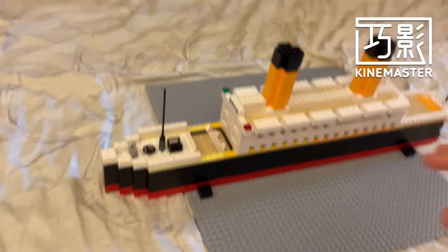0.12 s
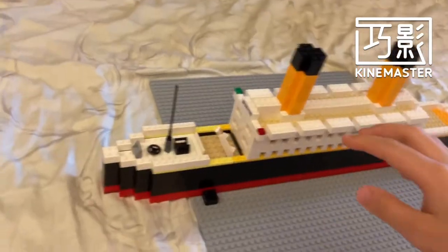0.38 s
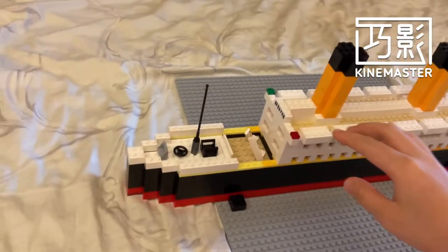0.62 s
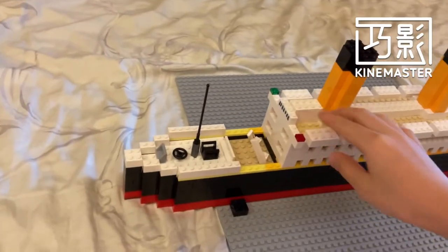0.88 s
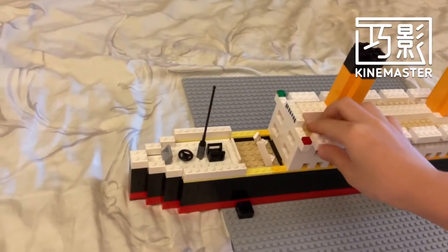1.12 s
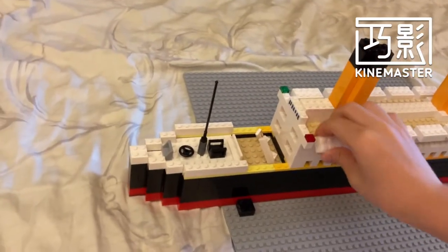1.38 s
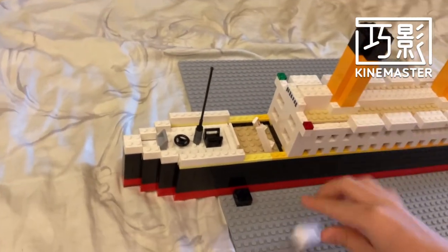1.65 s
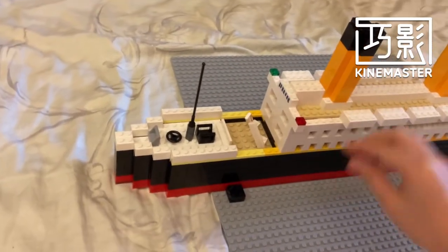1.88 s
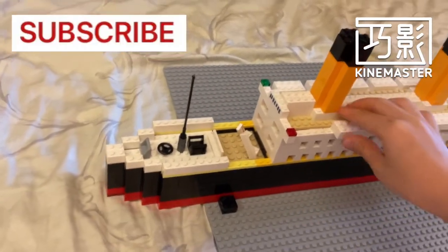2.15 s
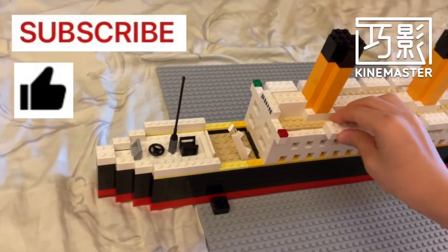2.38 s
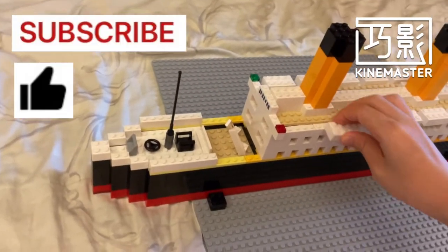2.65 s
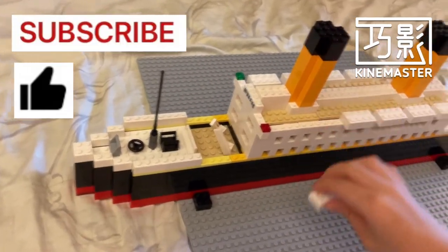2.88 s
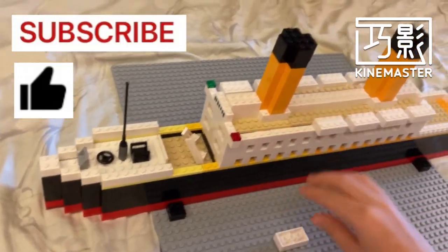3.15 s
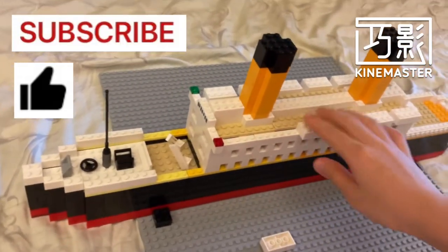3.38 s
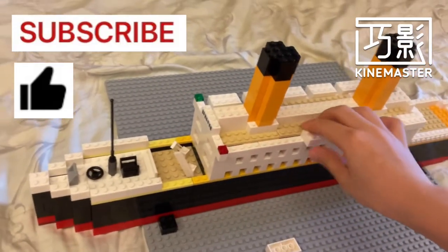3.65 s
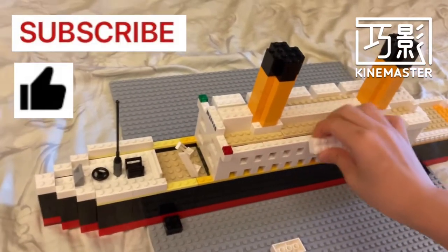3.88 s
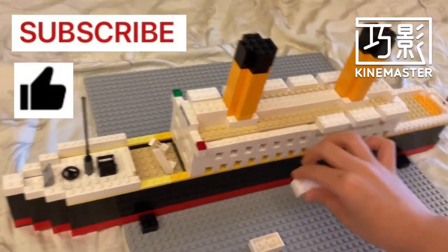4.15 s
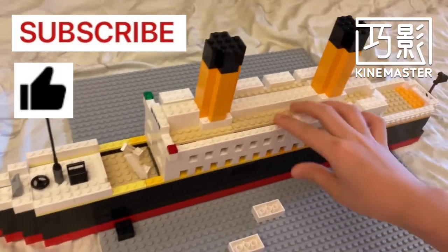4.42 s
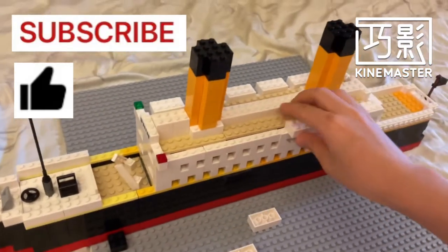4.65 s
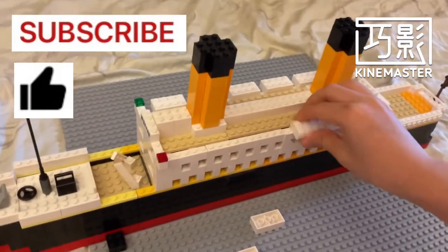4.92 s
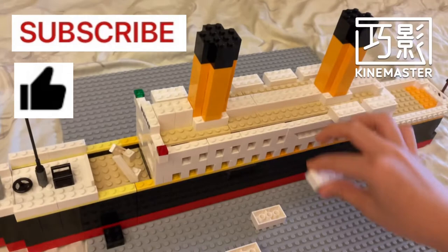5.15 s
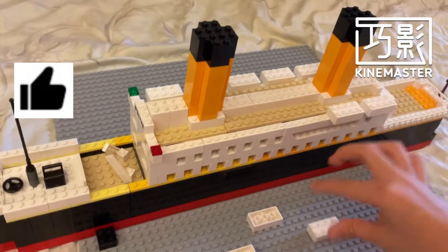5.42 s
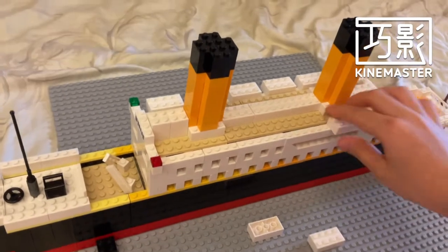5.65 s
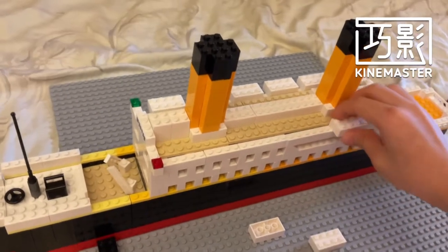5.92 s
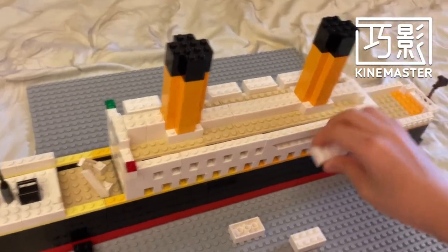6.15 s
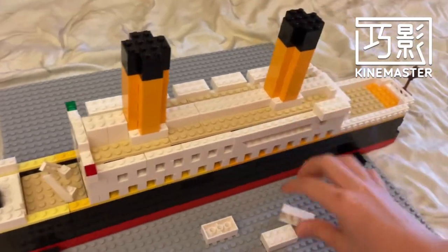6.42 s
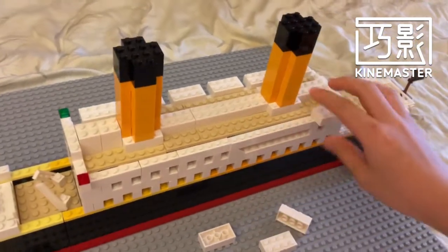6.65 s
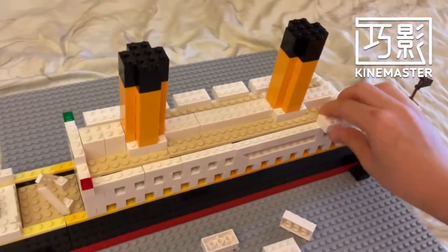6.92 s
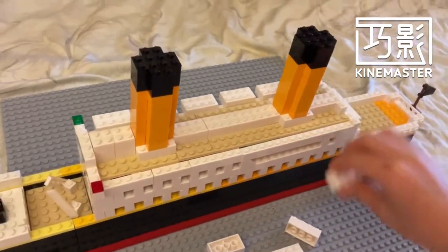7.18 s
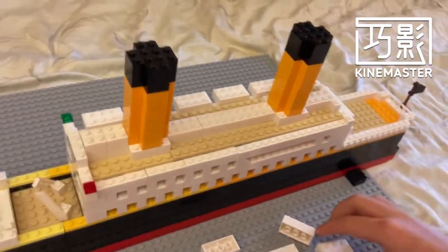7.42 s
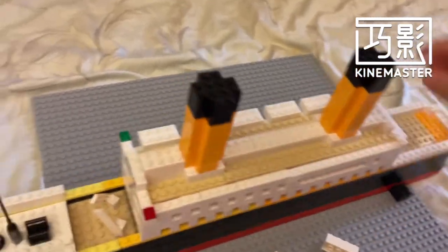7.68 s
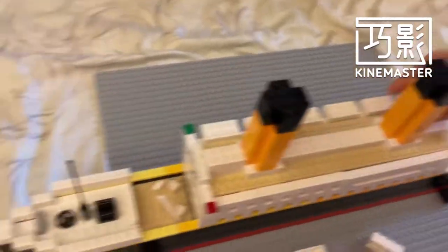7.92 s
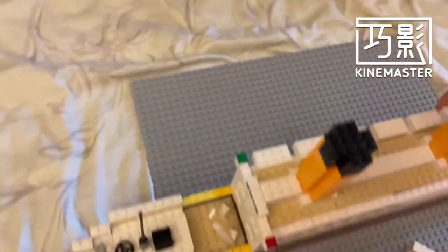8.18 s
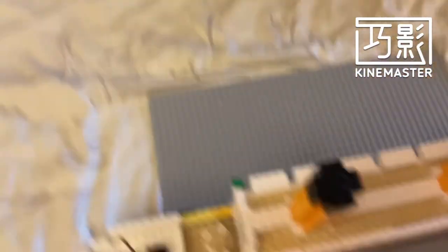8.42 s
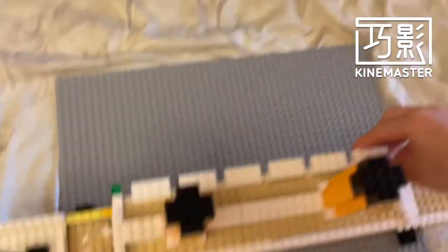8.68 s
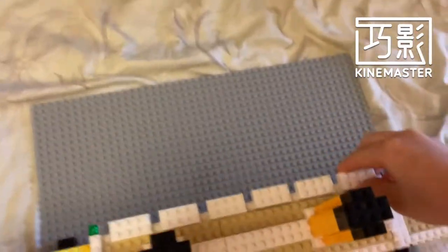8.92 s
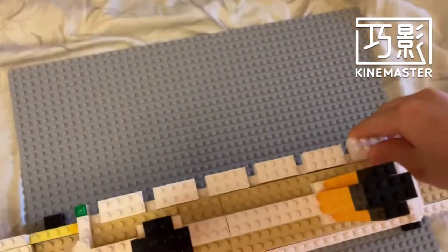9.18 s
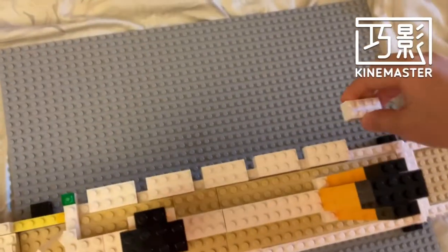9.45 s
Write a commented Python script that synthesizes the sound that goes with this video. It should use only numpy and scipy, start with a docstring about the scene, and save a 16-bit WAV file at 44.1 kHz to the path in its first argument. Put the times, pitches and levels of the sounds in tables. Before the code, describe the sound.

Close to the microphone in a quiet bedroom, fingers pry small plastic bricks from a toy ship. Roughly once a second comes a sharp snap, then the loose brick lands with a quick rattle of bright, hollow clicks. Light nail ticks fill the gaps. After the sixth drop there is more soft skin and cloth rubbing, a dull faint thud, then one last snap, over a low quiet ventilation hum.

```python
"""A low ventilation hum fades up in 0.2 s; then fingers pry small plastic bricks off a toy ship
and drop them on a studded base plate, in a quiet bedroom. Each contact is a click, a crack of brief modes
and longer modes of hollow brick and plate, under one colour; dropped bricks bounce several times.
Skin and cloth rub as grainy noise, more so late on, with one dull thud of low noise.
A short tail of decaying noise answers the contacts and the rubbing."""
import sys
import numpy as np
from scipy import signal
from scipy.fft import rfft, irfft, next_fast_len
from scipy.io import wavfile
from scipy.ndimage import uniform_filter1d, map_coordinates

SR = 44100
rng = np.random.default_rng(int(sys.argv[2]) if len(sys.argv) > 2 else 0)


def wav_out(sig):
    """Save sig, one row per channel (or a flat mono array), as 16-bit PCM at SR to the path in sys.argv[1]."""
    wavfile.write(sys.argv[1], SR, np.round(np.clip(np.atleast_2d(sig).T, -1, 1) * 32767).astype(np.int16))


def nominal_scale(level):
    """Amplitude ratio for a level in decibels (scalar or array-like)."""
    x = np.asarray(level, float) / 20
    return 10 ** x


N = 421596  # samples
CRACK_MODES = 48  # brief modes of a full crack
LOOSE_WET_DB = -14  # room send of all but the snaps


def unit(x):
    """Scaled to rms 1."""
    return x / np.sqrt(np.mean(x ** 2) + 1e-20)


def along(points, hz):
    """(Hz, value) points read on a log axis."""
    f, v = np.transpose(points)
    return np.interp(np.log(hz + 1), np.log(f + 1), v)


def wobble(rate_hz):
    """A smooth random curve, rate_hz knots a second."""
    knots = rng.standard_normal(int(N * rate_hz / SR) + 4)
    return map_coordinates(knots, [np.arange(N) * rate_hz / SR])


def hiss(spectrum, patchy_db):
    """Coloured noise of rms 1 with time-frequency patches of random gain."""
    z = signal.stft(rng.standard_normal(N), nperseg=512)[2]
    field = uniform_filter1d(rng.standard_normal(z.shape), size=5, axis=0)
    field = uniform_filter1d(field, size=10, axis=1)
    patchy = signal.istft(z * nominal_scale(patchy_db * unit(field)), nperseg=512)[1][:N]
    m = next_fast_len(N + 8192)
    gain = nominal_scale(along(spectrum, np.fft.rfftfreq(m, 1 / SR)))
    return unit(irfft(rfft(patchy, m) * gain, m)[:N])


def air():
    """Ventilation: patchy low noise with two lines wavering in level and phase."""
    # room tone: hz, relative density_db (per Hz)
    air_spectrum = [(24, -66), (40, -27.5), (69, -11), (226, -4.5), (372, -15), (663, -12), (790, -19.5),
                    (918, -15.5), (1270, -23.5), (2500, -32), (3650, -38.5), (16000, -52.5)]
    # unsteady low lines: hz, mid-level peak_db
    hum_lines = [(80, -69), (119, -67.5)]
    t = np.arange(N) / SR
    lines = 0
    for hz, peak_db in hum_lines:
        lines = lines + nominal_scale(peak_db + 3.3 * wobble(12)) * np.sin(2 * np.pi * hz * t + 6.6 * wobble(6))
    return nominal_scale(-59.5 + 0.8 * wobble(3.1)) * hiss(air_spectrum, patchy_db=1.8) + lines


def thud():
    """A dull thud: a short half-sine swell of noise two octaves wide."""
    start_s, length_s, centre_hz, level_db = 8.235, .07, 170, -52
    band = signal.butter(2, [centre_hz / 2, centre_hz * 2], "band", fs=SR, output="sos")
    low = signal.sosfilt(band, rng.standard_normal(N))
    swell = np.sin(np.pi * np.clip((np.arange(N) / SR - start_s) / length_s, 0, 1))
    return nominal_scale(level_db) * unit(low) * swell


def cloth():
    """Skin and cloth rubbing: half-sine swells of friction noise, grainy by fast random gain."""
    # strokes: start_s, length_s, swell_db (before the grain)
    rub_strokes = [(1.298, 0.24, -67.5), (2.233, 0.031, -58.5), (5.625, 0.066, -68.5), (7.653, 0.214, -73),
                   (7.814, 0.23, -62.5), (8.025, 0.39, -65.5), (5.86, 0.13, -69), (9.297, 0.09, -69.5)]
    # rubbing noise: hz, relative density_db (per Hz)
    weave_spectrum = [(880, -9), (1800, -4.5), (7750, -13), (15500, -23.5)]
    t = np.arange(N) / SR
    strokes = sum(nominal_scale(swell_db) * np.sin(np.pi * np.clip((t - start_s) / length_s, 0, 1))
                  for start_s, length_s, swell_db in rub_strokes)
    grain = nominal_scale(1.5 * wobble(400) + 1.5 * wobble(90) ** 2 + 1.5 * wobble(25))
    return strokes * grain * hiss(weave_spectrum, patchy_db=2.5)


def room(x):
    """Noise tail, each frequency dying at its own speed; a fresh random tail is drawn every 0.25 s."""
    # decay of the room: hz, t60_s
    room_decay = [(300, 0.41), (800, 0.45), (2100, 0.37), (7000, 0.32), (14600, 0.18)]
    out, step = np.zeros(N + 2 * SR), round(0.25 * SR)
    for start in range(0, N, step):
        hz, t, z = signal.stft(rng.standard_normal(SR // 2), SR, nperseg=256)
        decay = nominal_scale(-60 * t / along(room_decay, hz)[:, None])
        tail = signal.istft(z * decay, SR, nperseg=256)[1]
        tail = tail * (1 - np.exp(-np.arange(len(tail)) / SR / 0.0012))  # first walls are a few ms away
        wet = signal.fftconvolve(x[start:start + step], tail / np.linalg.norm(tail))
        out[start:start + len(wet)] += wet
    return out[:N]


def causal(gain):
    """The sharpest pulse that starts at zero with this spectrum (minimum phase, by folded cepstrum)."""
    cepstrum = irfft(np.log(gain + 1e-9))
    half = len(cepstrum) // 2
    fold = np.r_[1, np.full(half - 1, 2), 1, np.zeros(half - 1)]
    return irfft(np.exp(rfft(cepstrum * fold)))


def colour(wall_hz, edge_db, knock_hz, knock_db, stud_db, mids):
    """(Hz, dB) points of a contact: knock, shoulder, valley, wall, edge tick, stud ring; wall at 0 dB."""
    shoulder_hz, shoulder_db, valley_hz, valley_db = mids
    return [(250, knock_db - 28), (knock_hz * 0.5, knock_db - 10), (knock_hz, knock_db),
            (knock_hz * 1.26, knock_db - 2.5),
            (shoulder_hz, shoulder_db + 0.16 * knock_db), (valley_hz, valley_db),
            (wall_hz * 0.83, -4), (wall_hz, 0),
            (max(8500, wall_hz * 1.4), edge_db), (11300, edge_db - 4.5), (12100, edge_db + stud_db),
            (13100, edge_db - 8.5), (16000, edge_db - 13.0)]


def contacts():
    """Rows of (start_s, level_db, long_db, wall mode, wet_db, brief modes, colour) of every contact."""
    # a brick lets go of its studs; last three relative to the wall:
    # start_s, wall_level_db, wall_hz, hull_knock_db, shoulder_db, edge_tick_db
    snaps = [(1.3841, -3.5, 5020, -6.5, -11.5, -6.5), (2.5386, 0.5, 3940, -6.5, -0.5, -8),
             (3.8763, 10.5, 6530, -10.5, -3.5, -6.5), (4.9437, 1.6, 5450, -6.5, 0, -4),
             (5.985, -4, 6060, -2, -3, -9), (7.0089, 0.5, 5890, -14.5, -2, -13),
             (9.154, 0.5, 7400, -4, -3.5, -16.5)]
    # a loose brick lands; its bounces share wall and plate pitch and stud ring:
    # start_s, wall_hz, plate_hz, stud_over_edge_db
    drops = [(1.7145, 4530, 963, -5.5), (3.0512, 4130, 1094, -6.5), (4.3305, 4400, 763, -12),
             (5.3475, 4480, 1000, 6.5), (6.3845, 4040, 935, -0.5), (7.3431, 4105, 1003, -10)]
    # contacts of a tumbling brick; last two relative to the wall:
    # start_s, wall_level_db, plate_knock_db, edge_tick_db
    bounces = [(1.714, 11.5, -6, -12.5), (1.7181, 3, -8.5, -14.5), (1.7241, 15, -4.5, -13),
               (1.7476, 3, -5.5, -13), (1.7502, 1, -12, -17.5), (1.7593, 0.5, -4.5, -10),
               (1.771, 3.5, -10, -14.5), (1.7905, -4.5, -12, -23.5), (1.8081, 7.5, -13, -16),
               (3.0509, 8.5, -3, -8), (3.0527, 1, 8, -1.5), (3.097, 5.5, -1.3, -4.5), (3.11, -11.5, 1, -13),
               (4.3293, 3, -3.5, -7), (4.3325, 13.5, -3.5, -9.5), (4.387, 5, 1, -5), (4.43, -11.5, 2, -11),
               (4.4485, -10.5, 4.5, -21), (4.463, -3.5, -14.5, -11.5), (4.469, 0.7, -7, -5),
               (5.3467, 4, 2.5, -15), (5.354, 7.5, -2.5, -8.5), (5.3683, -3.5, 3.5, -2.5),
               (5.3852, -12.5, 1, -6), (5.395, -14, 3, -3.5), (5.4054, -7, 0, -19), (5.4174, -1, -1, -15),
               (5.436, -6, -2, -25.5), (5.4423, -7.5, -11, -16.5), (6.3842, 5, -3, -5),
               (6.3961, -3.5, -5, -16), (6.4043, 4.5, 3, -11), (6.4121, -11.5, 6, -11), (6.444, 4, 2, -5),
               (7.3312, -18, 4, -21), (7.3422, 2, 1.5, -13.5), (7.3528, -6.5, -5, -19),
               (7.364, -13.5, 6, -13), (7.4233, -11.5, -0.5, -10), (7.4391, -1, -0.5, -13),
               (7.4476, -2, -5, -9), (7.4571, 2, -1, -9), (7.4679, 3.5, -5.5, -16), (7.4733, -8, 4.5, -6),
               (7.494, -10, 2, -17)]
    # fingers and nails tick on held bricks; last two relative to the wall:
    # start_s, wall_level_db, hull_knock_db, edge_tick_db
    touches = [(1.3124, -17.5, -12, 8), (1.355, -11.5, -53, -4), (1.391, -15, 1.5, 1),
               (1.703, -22.5, 3, -39), (2.251, -14.5, -11.5, -3), (2.266, -16, -7, -10),
               (2.3, -21.5, -30.5, -8), (2.3133, -22, -30, 10.5), (2.358, -18.5, -14, -10.5),
               (2.4948, -24, -15.5, -17), (2.603, -7, -16, -9.5), (3.719, -23, -4, -6),
               (3.774, -23.5, -5, -9), (4.74, -15, -7, 4.5), (4.7545, -18, -4, 2.5), (4.84, -10, -43, 1.5),
               (4.866, -12.5, -13.5, 5), (4.8812, -22.5, -18, 8), (5.6354, -23, -8, -6.5),
               (5.844, -23, -8, 3), (5.8733, -18, -1, 2.5), (5.9, -26.5, -8.5, 4), (5.935, -23, -12, -2),
               (5.975, -14.5, -13, -2), (6.7322, -28.5, -2, 2), (6.83, -20, -2.5, -9.5),
               (6.9487, -21, -24.5, 0.5), (7.847, -34, -25, 17), (7.9122, -11.5, -3.5, 0.5),
               (7.978, -18.5, -13, -6), (8.052, -21, -4, -36), (8.208, -22, -1, 3.5),
               (8.462, -17.5, -20, 1), (8.4754, -16, -27.5, 0), (8.8981, -14.5, -10, 0.5),
               (8.9996, -19.5, -20, -1.5), (9.0543, -20.5, 0.5, -4.5), (9.312, -21, -11.5, 0.5)]
    loose_db, held_db = -4, -11.5  # long modes; fingers and studs damp a held brick
    hull_hz, hull_stud_db = 1008, -2.5  # ship's hull knock; stud ring over the edge tick
    loose_mids = (1997.5, -4, 3101, -6)  # shoulder_hz, shoulder_db, valley_hz, valley_db
    # wall mode: hz, energy_db before long_db, lift toward the room (share, below 0 a dip)
    lift, snap_lift = -.3, 0.89  # a snap throws the wall's sound wide
    rows = []
    for s, db, wall_hz, knock_db, shoulder_db, edge_db in snaps:
        snap_mids = (2000, shoulder_db, 2400, -11.5)
        tint = colour(wall_hz, edge_db, hull_hz, knock_db, hull_stud_db, snap_mids)
        rows.append((s, db, held_db, (wall_hz, 13, snap_lift), -16, CRACK_MODES, tint))
    for s, db, plate_db, edge_db in bounces:
        _, wall_hz, plate_hz, stud_db = min(drops, key=lambda drop: abs(drop[0] - s))
        tint = colour(wall_hz, edge_db, plate_hz, plate_db, stud_db, loose_mids)
        rows.append((s, db, loose_db, (wall_hz, 8, lift), LOOSE_WET_DB, CRACK_MODES, tint))
    for s, db, knock_db, edge_db in touches:
        wall_hz = 4500 * np.exp(0.042 * rng.standard_normal())  # scattered pitch
        tint = colour(wall_hz, edge_db, hull_hz, knock_db, hull_stud_db, loose_mids)
        # a light touch wakes fewer modes
        rows.append((s, db, held_db, (wall_hz, 13.5, lift), LOOSE_WET_DB, 36, tint))
    return rows


def blow(t, tint, long_db, wall, rise_s, count):
    """One contact, nearby and all round: click, crack of brief modes and longer modes, in one colour."""
    # longer-lived modes of plate and brick: hz, energy_db (before long_db and colour), t60_s
    long_modes = [(595, 1, 0.17), (1038, -1, 0.1), (1785, -3, 0.03), (2054, 0.5, 0.013), (5507, 5, 0.023),
                  (6234, 5.5, 0.02), (7820, -3.5, 0.026), (8210, 6, 0.018), (10200, -0.5, 0.023),
                  (12080, 2, 0.017)]
    # life of the crack's brief modes: hz, t60_s
    brief_life = [(400, 0.046), (1500, 0.03), (5000, 0.014), (15000, 0.008)]
    wall_hz, wall_db, wall_lift = wall
    knock_hz = max((point for point in tint if point[0] < 1300), key=lambda point: point[1])[0]
    knock_mode, wall_mode = (knock_hz, 5, 0.015), (wall_hz, wall_db, 0.011)

    brief_hz = 300 * 52 ** ((np.arange(count)[:, None] + rng.random((count, 1))) / count)
    brief_db = 0 * brief_hz + 10 * np.log10(CRACK_MODES / count) - 2.5
    hz, db, t60_s = np.transpose([*long_modes, knock_mode, wall_mode])[..., None]
    hz = np.vstack([brief_hz, hz * (1 + 0.004 * rng.standard_normal(hz.shape))])
    t60_s = np.vstack([along(brief_life, brief_hz), t60_s])
    db = np.vstack([brief_db, db + long_db]) + 3 * rng.standard_normal(hz.shape) + along(tint, hz)
    size = nominal_scale(db) / np.sqrt(t60_s * SR)  # the dB give each mode's energy
    ring = size * nominal_scale(-60 * t / t60_s) * np.sin(2 * np.pi * (hz * t + 0.41 * rng.random(hz.shape)))
    ring = ring * (1 - np.exp(-t / rise_s))
    crack, modes, wall_ring = ring[:count].sum(0), ring[count:-1].sum(0), ring[-1]

    # summed over all directions crack and wall blur into one smooth pulse
    grid_hz = np.fft.rfftfreq(len(t), 1 / SR) + 1
    smooth = nominal_scale(along(tint, grid_hz)) / np.sqrt(grid_hz)
    lift = 1 + wall_lift * np.exp(-(np.log(grid_hz / wall_hz) / .16) ** 2)
    wide = causal(smooth * lift)
    click = causal(smooth)
    scale = np.linalg.norm(crack) / np.linalg.norm(click)
    hardness = 0.6 * nominal_scale(-rise_s / 0.00013)  # soft contacts click less
    click = np.roll(click, round(min(2 * rise_s, .001) * SR))  # the click comes as the force peaks
    near = hardness * scale * click + crack + modes + wall_ring
    all_round = 1.2 * scale * wide + 0.35 * crack + 0.6 * modes
    return np.array([near, all_round])


def bricks():
    """Every contact in its own colour, and decaying hollow notes: nearby, and as sent into the room."""
    # hollow knocks with one clear note: start_s, pitch_hz, level_db, t60_s
    hollow_knocks = [(6.8336, 894, -42, 0.1), (8.338, 925, -51, 0.08)]
    out, t = np.zeros((2, N + SR)), np.arange(SR // 14) / SR
    for s, db, long_db, wall, wet_db, count, tint in contacts():
        rise_s = 0.00024 * nominal_scale(-.4 * min(db - 15.0, 0))  # gentle touches start softly
        gains = nominal_scale([[db], [db + wet_db]])
        out[:, round(s * SR):][:, :len(t)] += gains * blow(t, tint, long_db, wall, rise_s, count)
    for s, hz, db, t60_s in hollow_knocks:
        decay = nominal_scale([[db], [db + LOOSE_WET_DB]] - 60 * t / t60_s)
        out[:, round(s * SR):][:, :len(t)] += decay * np.sin(2 * np.pi * hz * t)
    # objects this small radiate no bass
    band = signal.butter(4, [400, 15900], "band", fs=SR, output="sos")
    return signal.sosfilt(band, out[:, :N])


def scene():
    """Near contacts and rubbing, their room tail, the thud and the room tone."""
    (near, all_round), rubbing = bricks(), cloth()
    tail = room(all_round + nominal_scale(LOOSE_WET_DB) * rubbing)
    return (near + rubbing + tail + air() + thud())[None]


def top_cut(x):
    """Nothing passes above the cut-off."""
    return signal.sosfilt(signal.butter(12, 16750, fs=SR, output="sos"), x)


def record(dry):
    """The loudest peaks clip; then a fade-in that ends in a steady gain."""
    # fade-in: time_s, gain_db
    fade_points = [(0, -120), (.03, -40), (.08, -8), (.2, 4)]
    time_s, gain_db = np.transpose(fade_points)
    clipped = np.clip(dry, -.82, .82)
    mix = clipped * nominal_scale(np.interp(np.arange(N) / SR, time_s, gain_db))
    return top_cut(mix)


dry = scene()
out = record(dry)
wav_out(out)
```